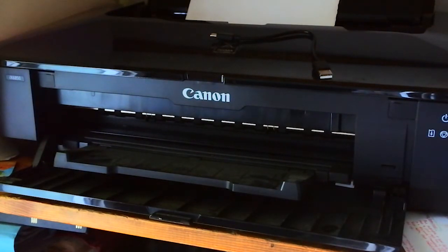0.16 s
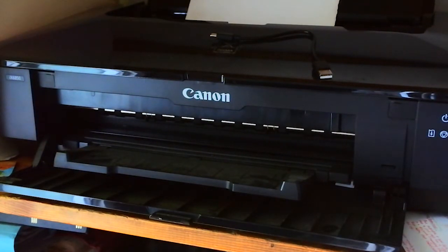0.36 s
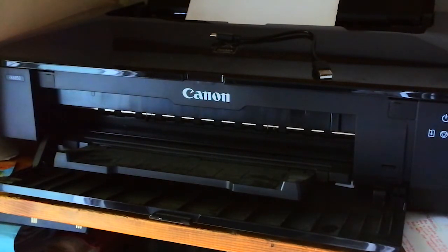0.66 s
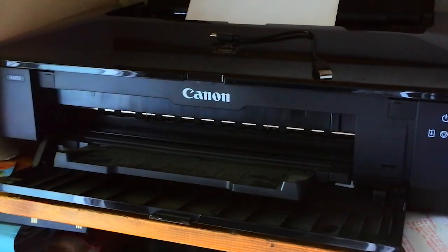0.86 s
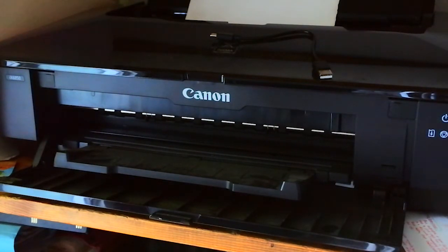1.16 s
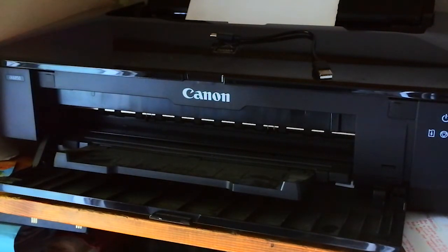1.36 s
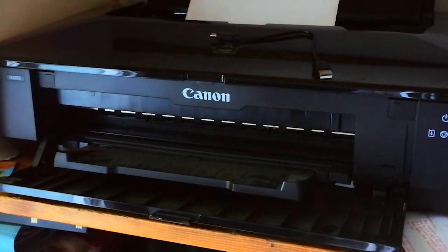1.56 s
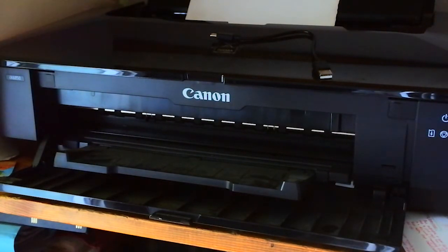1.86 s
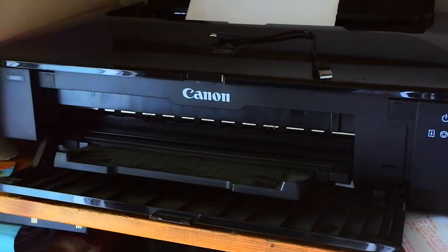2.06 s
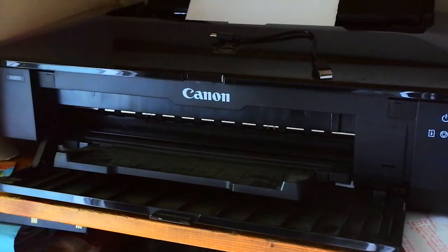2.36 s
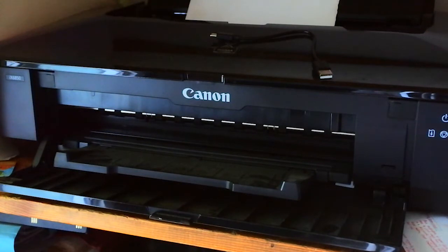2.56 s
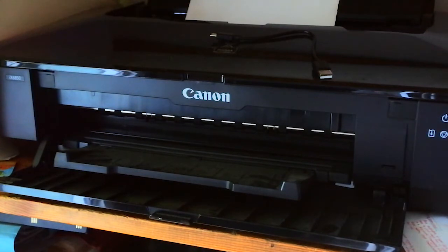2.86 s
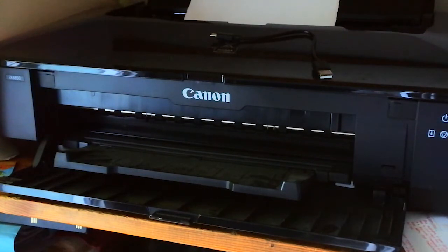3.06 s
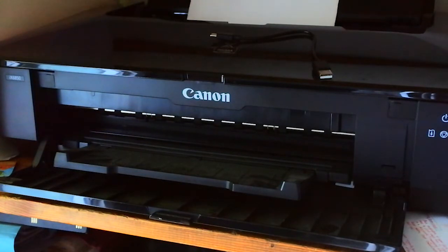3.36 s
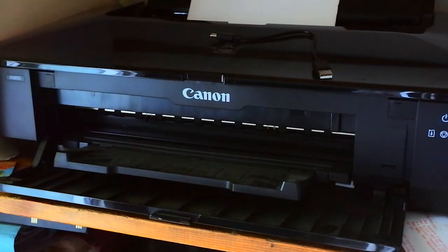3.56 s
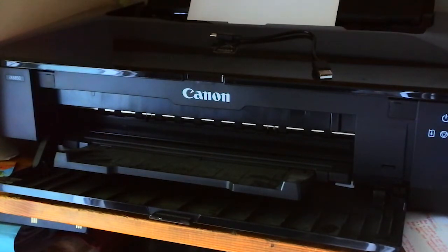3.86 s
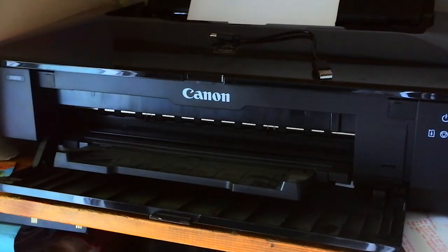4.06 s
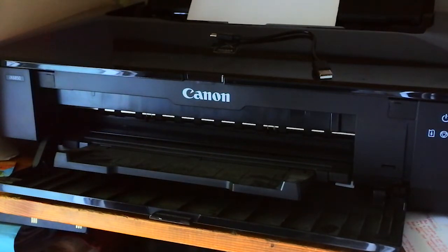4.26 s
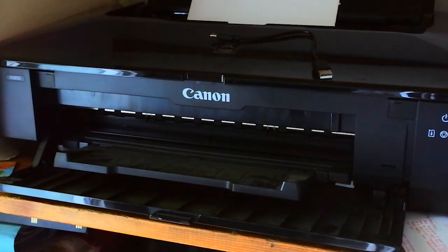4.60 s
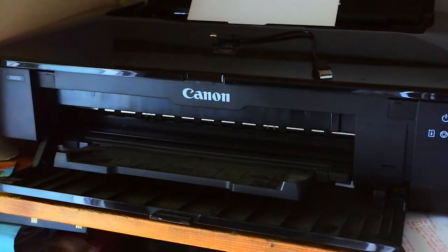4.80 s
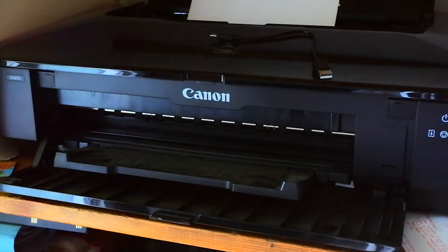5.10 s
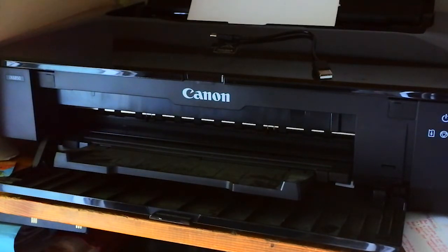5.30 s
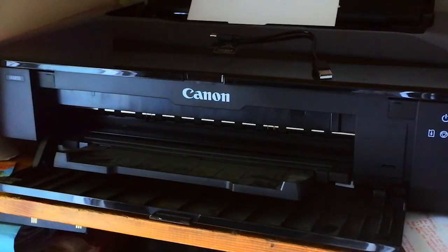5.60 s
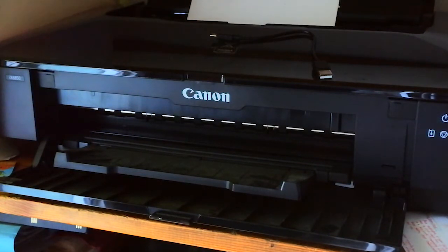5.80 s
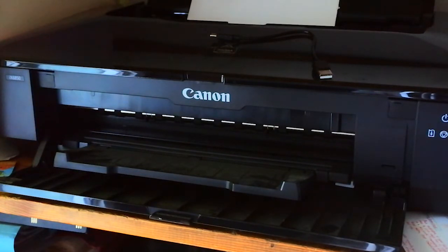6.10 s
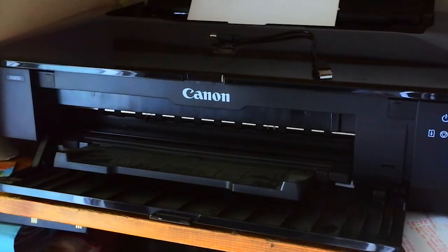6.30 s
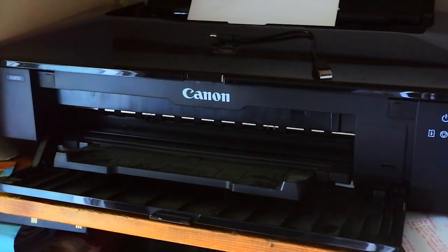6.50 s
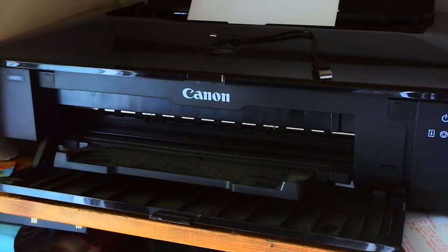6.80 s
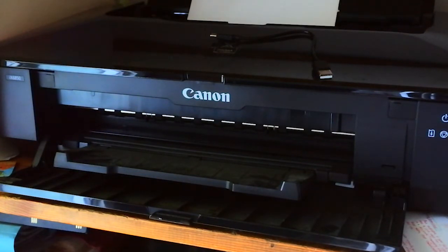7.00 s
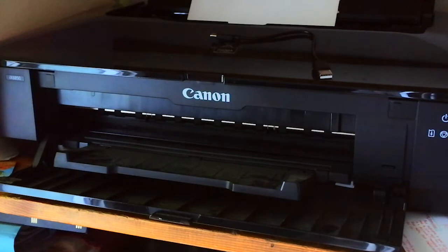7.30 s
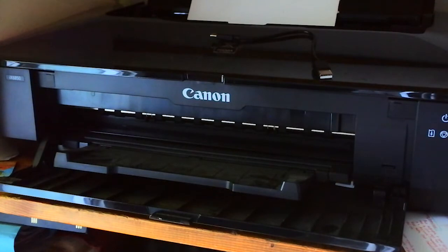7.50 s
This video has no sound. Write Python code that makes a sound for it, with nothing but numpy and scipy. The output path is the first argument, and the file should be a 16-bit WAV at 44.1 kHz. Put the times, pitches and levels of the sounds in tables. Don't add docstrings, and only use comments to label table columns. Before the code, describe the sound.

Quiet indoor air, then scattered plastic ticks, taps and brief scrapes from a nearby printer mechanism. After a lull comes a dense, loud paper grab: sharp clacks, dull rebounds, rumbling rollers and rasping paper. From then on the head shuttles regularly, its hissing whir dipping briefly just under every half second while a muted double knock marks the reversal. Close, dry stereo sound with a short small-room echo.

```python
import sys
import numpy as np
from scipy import signal
from scipy.fft import rfft, irfft
from scipy.io import wavfile
from scipy.ndimage import uniform_filter1d

SR = 44100
rng = np.random.default_rng(int(sys.argv[2]) if len(sys.argv) > 2 else 0)


def natural_amplitude(level_db):
    exponent = np.asarray(level_db, float) / 20
    return 10 ** exponent


def dump(signal):
    limited = np.clip(np.atleast_2d(signal).T, -1, 1)
    pcm = np.round(limited * 32767).astype(np.int16)
    wavfile.write(sys.argv[1], SR, pcm)


N = 337365
TIME = np.arange(N) / SR


def evened(x):
    return x / np.sqrt(np.mean(x ** 2) + 1e-20)


def read(points, hz):
    f, value = np.transpose(points)
    return np.interp(np.log(hz + 1), np.log(f + 1), value)


def coloured(x, points, peaks=(), lift=0.):
    hz = np.abs(np.fft.fftfreq(8192, 1 / SR))
    resonance = sum(lift * natural_amplitude(db) / (1 + ((hz - f) / width * 2) ** 2) for f, width, db in peaks)
    log_gain = np.log(natural_amplitude(read(points, hz)) * (1 + resonance) + 1e-5)
    minimum_phase = -signal.hilbert(log_gain).imag
    taps = np.fft.ifft(np.exp(log_gain + 1j * minimum_phase)).real[:4096]
    return signal.oaconvolve(x, taps)[:len(x)]


# (from f/Hz, to f/Hz)
LEVEL_BANDS = [(100, 450), (500, 3000), (3000, 12000)]


def thirds(x):
    hz, z = np.fft.rfftfreq(len(x), 1 / SR), rfft(x)
    low = 1 / (1 + (hz / 470) ** 6)
    high = 1 / (1 + (3000 / (hz + 1)) ** 8)
    parts = [low, 1 - low - high, high]
    power = [2 * np.sum(abs(z[(hz > a) & (hz < b)]) ** 2) / len(x) ** 2 for a, b in LEVEL_BANDS]
    return [irfft(z * part, len(x)) / np.sqrt(p) for part, p in zip(parts, power)]


def wobble(seconds, depth_db):
    size = round(seconds * SR)
    wander = uniform_filter1d(uniform_filter1d(rng.standard_normal(N), size), size)
    return natural_amplitude(depth_db * evened(wander))


def tail(t60s, start_s):
    hz, t, z = signal.stft(rng.standard_normal(SR // 2), SR, nperseg=256)
    decay = natural_amplitude(-60 * t / read(t60s, hz)[:, None])
    echo = signal.istft(z * decay, SR, nperseg=256)[1]
    return np.r_[np.zeros(round(start_s * SR)), echo / np.linalg.norm(echo)]


# (f/Hz, level/dB per Hz)
AIR_COLOUR = [(15, -10.5), (25, -28.5), (55, -8), (91, -17.5), (161, -13.5), (195, -12.5), (229, -25),
              (317, -15), (373, -22.5), (839, -27), (1260, -23.5), (2680, -31.5), (5720, -32.5),
              (13600, -45), (16000, -60)]
# (f/Hz, side re mid level/dB)
AIR_SIDE = [(60, -6.5), (110, -13), (200, -4.5), (380, -5), (700, -1.5), (1290, -3), (2380, 0),
            (4400, -0.5), (8120, 0.5), (15000, -1)]


def room_tone():
    mid, side = (coloured(rng.standard_normal(N), AIR_COLOUR) for _ in range(2))
    gain = natural_amplitude(-65) / np.sqrt(np.mean(mid ** 2))
    hum = natural_amplitude(-72) * wobble(.06, 3.8) * np.sin(2 * np.pi * 50.2 * TIME)
    return gain * mid * wobble(0.017, 0.33) + hum, gain * coloured(side, [(25, -20)] + AIR_SIDE)


def friction(rows, colour, peaks, lift, tick_db, ticks_per_s, lumps_db, dip_db=0.):
    tick_gain = natural_amplitude(tick_db + 1.4 * np.minimum(rng.exponential(1, N), 2))
    ticks = tick_gain * (rng.random(N) < ticks_per_s / SR)
    parts = thirds(coloured(rng.standard_normal(N) * (1 + ticks), colour, peaks, lift))
    s, *levels = np.transpose(rows)
    fade = np.clip(np.minimum(TIME - s[0], s[-1] + 0.032 - TIME) / 0.063, 0, 1)
    low, mid, high = (natural_amplitude(np.interp(TIME, s, db)) * p * fade for db, p in zip(levels, parts))
    lumps = wobble(0.0095, lumps_db)
    return low * wobble(0.023, lumps_db) + lumps * (mid * natural_amplitude(-.34 * dip_db) + high * natural_amplitude(-dip_db))


# (f/Hz, width f/Hz, level/dB)
CASE_MODES = [(155, 430, -15.5), (530, 51, 1), (753, 106, -6.5), (1070, 18, -12), (1230, 90, -6),
              (1680, 110, -10), (2100, 72, -55), (2530, 510, -5.5), (3270, 22, 3), (4430, 146, -3),
              (5650, 97, -43), (5800, 51, -41), (6350, 42, -32), (6850, 77, -21), (8200, 59, -18),
              (8140, 65, -26)]
# (f/Hz, level/dB per Hz)
DRIVE_SPECTRUM = [(41, -45), (70, -44.5), (113, -7), (256, -6.5), (314, -9.5), (368, -5.5), (421, -10.5),
                  (1250, -12), (1440, -16), (3650, -22.5), (4480, -20), (9690, -28), (16000, -52)]
# (t/s, drag level/dB)
SHEET_DRAG = [(2.8, -78), (2.97, -76), (3.04, -60), (3.164, -59), (3.27, -67), (3.41, -63), (3.52, -61),
              (3.56, -64), (3.6, -84), (3.64, -70), (3.71, -63), (3.768, -90), (3.81, -66), (4.03, -58.5),
              (4.28, -59), (4.52, -57), (4.66, -54), (4.7, -60)]


def drive_train():
    s, drag = np.transpose(SHEET_DRAG)
    swing = drag + 62
    eased_s = np.maximum(s - 4.1, 0)
    creeping = s < 2.99
    rollers = -49.5 - 13 * creeping - 15 * eased_s + .2 * swing
    gears = -54 + .7 * swing - 12 * creeping - 10 * eased_s
    idle_db = np.array([-71, -73, -80])
    resting_db = idle_db - 14
    idling = [(.2, *idle_db), (2.1, *idle_db), (2.3, *resting_db), (s[0] - .05, *resting_db)]
    rows = idling + list(zip(s, rollers, gears, drag))
    return friction(rows, DRIVE_SPECTRUM, CASE_MODES, 0.6, 8.1, 180, 1.33)


# (t/s, length t/s, rumble level/dB, rubbing level/dB, rumble f/Hz)
CAM_RUBS = [
    (0.251, 0.12, -58, -58, 500),
    (0.585, 0.1, -59, -57, 800),
    (.66, .08, -62, -56, 330),
    (1.25, .13, -63, -72, 200),
    (2.08, .25, -73, -80, 480),
    (2.855, 0.085, -54, -64, 780),
    (2.995, .12, -47, -42, 180),
    (3.388, .12, -49, -56, 104),
]
# (t/s, length t/s, rumble level/dB, rubbing level/dB, rumble f/Hz)
PAPER_RUBS = [(.33, .13, -56, -54, 150), (0.679, 0.056, -49, -57, 380), (0.884, 0.065, -63, -54, 500),
              (1.465, 0.1, -56, -55.5, 200), (1.867, 0.021, -71, -57, 300), (1.89, .09, -54, -60, 330),
              (1.95, 0.13, -53, -61, 130), (3.002, 0.13, -47, -59, 105), (3.288, 0.099, -48, -44.5, 110),
              (3.396, 0.061, -52, -44, 394), (3.64, 0.105, -55, -51, 276), (3.812, 0.073, -38, -37, 288),
              (3.92, .05, -51, -46, 200), (3.987, 0.093, -44, -64, 100), (4.057, 0.17, -39.5, -52, 231),
              (4.534, 0.16, -61, -58, 201)]


def slips():
    low, mid, high = thirds(coloured(rng.standard_normal(N), DRIVE_SPECTRUM, CASE_MODES, lift=1.7))
    lumps, out = wobble(0.0075, 2.66), np.zeros(N)
    rows = [(*row, -18) for row in CAM_RUBS] + [(*row, -8.5) for row in PAPER_RUBS]
    for s, length, rumble_db, chatter_db, hz, hiss_db in rows:
        part = slice(round(s * SR), round((s + length) * SR))
        shake = evened(signal.lfilter(*signal.iirpeak(hz, 2.7, SR), low)[part])
        rub = lumps[part] * natural_amplitude(chatter_db) * (mid[part] + natural_amplitude(hiss_db) * high[part])
        out[part] += (natural_amplitude(rumble_db) * shake + rub) * signal.windows.tukey(len(shake), .5)
    return out


# (f/Hz, level/dB per Hz)
SLIDE_SPECTRUM = [(41, -57), (70, -34), (86, -13), (118, -4.5), (280, -6.5), (343, -3), (385, -12),
                  (634, -6), (955, -15.5), (1930, -18.5), (2540, -12), (3040, -15.5), (6590, -7.5),
                  (11100, -15.5), (16000, -35)]
# (f/Hz, width f/Hz, level/dB)
RAIL_MODES = [(641, 19, 2.5), (2580, 82, 1.5), (3520, 410, 3), (4140, 10, 10), (4670, 540, 5.5),
              (5360, 190, 3), (6340, 210, 0), (6350, 110, -22), (6950, 150, -5), (8800, 34, 8)]
# (brake t/s, restart t/s, knock level/dB, jerk level/dB, hiss dip level/dB)
HOME_END = [
    (4.995, 5.101, -44, -50, 32),
    (5.864, 5.963, -46.5, -47, 34),
    (6.725, 6.822, -44.5, -46, 23),
    (7.578, 7.68, -44, -45, 28),
]
FAR_END = [
    (5.397, 5.515, -50, -47, 15),
    (6.261, 6.375, -46.5, -46, 19),
    (7.109, 7.235, -47.5, -47, 16),
]


def print_head():
    stops = [(s, db, .032) for _, s, _, _, db in HOME_END]
    stops += [(s, db, .022) for _, s, _, _, db in FAR_END]
    dip_db = sum(db * np.exp(np.minimum(TIME - s, 0) / slow) * (TIME < s) for s, db, slow in stops)
    dip_db = uniform_filter1d(dip_db, 60)
    air_dip_db = np.zeros(N)
    for s, db, slow in stops:
        change_s = np.where(TIME < s, .71 * slow, .022)
        air_dip_db += .62 * db * np.exp(-abs(TIME - s) / change_s)
    sweeps = [(s, -62.5, -58.5, -55.5) for s in (4.65, (N + SR) / SR)]  # rumble, belt, hiss in dB
    slide = friction(sweeps, SLIDE_SPECTRUM, RAIL_MODES, .6, 4, 300, 0.83, dip_db)
    body = signal.sosfiltfilt(signal.butter(1, 8000, fs=SR, output="sos"), slide)
    teeth = evened(signal.lfilter(*signal.iirpeak(634, 634 / 55, SR), rng.standard_normal(N)))
    starting = np.clip((TIME - 4.58) / 0.044, 0, 1)
    whine = natural_amplitude(-69 - 1.5 * dip_db) * teeth * wobble(.08, 1.8) * starting
    return body + (slide - body) * natural_amplitude(-air_dip_db) + whine


# (lag t/s, level/dB re knock or jerk, fizz level/dB, thud level/dB, snap level/dB, rattle t/s)
BRAKE_AT_HOME = (-.003, 0, -17, 1.5, -5, .02)
SETTLE_AT_HOME = (.055, -10, -22, 3, -14, .014)
JERK_FROM_HOME = (.014, -1, -20, -12, -7, .016)
BRAKE_AT_FAR = (0, .5, -20, 0, -10, .02)
SHEET_STEPS_ON = (.056, 1.5, -19, -16, -3, .017)
JERK_FROM_FAR = (-.012, 0, -20, -3, -9, .02)
# (panel level/dB re knock, panel f/Hz, small part level/dB re knock, small part f/Hz)
RING_AT_HOME = (1.5, 420, -4, 2150)
RING_OF_STEP = (-4, 620, 0, 4500)


def turns():
    knocks, rings = [], []
    home = (HOME_END, [BRAKE_AT_HOME, SETTLE_AT_HOME], JERK_FROM_HOME, RING_AT_HOME)
    far = (FAR_END, [BRAKE_AT_FAR, SHEET_STEPS_ON], JERK_FROM_FAR, RING_OF_STEP)
    for rows, braking, jerk, (panel_db, panel_hz, small_db, small_hz) in (home, far):
        loudest_lag = max(braking, key=lambda knock: knock[1])[0]
        for brake_s, restart_s, db, jerk_db, _ in rows:
            knocks += [(brake_s + lag, db + rel, *rest) for lag, rel, *rest in braking]
            knocks.append((restart_s + jerk[0], jerk_db + jerk[1], *jerk[2:]))
            rings.append((brake_s + loudest_lag, db + panel_db, panel_hz, db + small_db, small_hz))
    return [knock for knock in knocks if knock[0] < N / SR], rings


# (t/s, rattle level/dB, snap level/dB re rattle, main ring f/Hz, main ring level/dB)
PAWL_BLOWS = [
    (3.06, -15, -5, 3270, -16),
    (3.387, -20, -4, 2494, -12.5),
]
LATCH_BLOWS = [
    (0.67, -30, -2, 2610, -27),
    (3.944, -44, -10, 2450, -34),
    (4.185, -30.5, 1, 4370, -25),
    (4.239, -44.5, -14, 2600, -38.5),
]
GEAR_BLOWS = [
    (0.934, -37, -15, 2100, -38),
    (1.685, -37, -11, 1900, -42),
    (1.709, -46.5, -11, 1680, -46),
    (3.41, -31, -26, 1656, -23),
    (3.797, -30, -10, 2130, -23),
    (3.917, -33, -5, 2080, -31),
    (5.127, -43, -8, 1720, -41),
]
TRAY_BLOWS = [
    (0.271, -42.5, -4, 514, -37),
    (0.369, -38.5, 3.5, 482, -33),
    (1.48, -43, -7, 325, -38),
    (3.698, -52, -15, 345, -40),
]
LEVER_BLOWS = [
    (0.897, -47, -9, 526, -43),
    (1.531, -45, -6, 519, -43),
    (2.997, -19, -13, 717, -14.5),
    (3.026, -26, -11, 794, -16),
    (3.293, -33.5, -17, 605, -33.5),
    (3.322, -33, -3, 651, -25),
    (3.85, -26, -12, 644, -23.5),
    (3.994, -35.5, -9.5, 293, -37.5),
    (4.301, -43, -19, 950, -42),
]
COVER_BLOWS = [
    (1.463, -49.5, -4, 1515, -49),
    (1.889, -36, -17, 694, -31.5),
    (2.848, -49, -13, 1520, -54),
    (3.092, -36, -22, 1106, -26),
    (3.189, -38.5, -18, 1220, -36.5),
]
# (second ring f/Hz, its level/dB re main, thud level/dB re rattle, fizz level/dB re snap, rattle t/s)
PAWL_BODY = (1130, -3.5, -30, -9, .01)
LATCH_BODY = (620, -11, -16, -16, .012)
GEAR_BODY = (1250, -10, -20, -24, .011)
TRAY_BODY = (2100, -15, 2, -12, .012)
LEVER_BODY = (2480, -8, -12, -13, .012)
COVER_BODY = (1750, -8, -12, -12, .013)
# (t/s, peak level/dB, snap level/dB re peak, thud level/dB re peak)
LOOSE_SHAKES = [(0.349, -50.5, -7, 12), (0.382, -34.5, -6, -7), (1.035, -51, -18, 8),
                (1.559, -48.5, -20, -3), (2.914, -53, -24, 6), (3.363, -31, -14, -28),
                (3.552, -45.5, -16, -12), (3.618, -46, -18, -2), (3.785, -45, -18, -10),
                (3.85, -33, -1, -4), (4.115, -45, -14, 11)]


def blows():
    rattles = [(s, db, snap - 7, thud, snap, .013) for s, db, snap, thud in LOOSE_SHAKES]
    rings = []
    parts = [(PAWL_BLOWS, PAWL_BODY), (LATCH_BLOWS, LATCH_BODY), (GEAR_BLOWS, GEAR_BODY),
             (TRAY_BLOWS, TRAY_BODY), (LEVER_BLOWS, LEVER_BODY), (COVER_BLOWS, COVER_BODY)]
    for rows, (other_hz, other_db, thud, fizz, length) in parts:
        for s, db, snap, hz, ring_db in rows:
            modes = sorted([(hz, ring_db), (other_hz, ring_db + other_db)])
            (large_hz, large_db), (small_hz, small_db) = modes
            rattles.append((s, db, snap + fizz, thud, snap, length))
            rings.append((s - .0015, large_db, large_hz, small_db, small_hz))
    return rattles, rings


def panels(rings):
    out, t = np.zeros(N + SR), np.arange(SR // 8) / SR
    lengths = (.012, .008)
    for (s, *modes), twin in zip(rings, rng.uniform(.85, 1.15, (len(rings), 2))):
        at = round((s - .001) * SR)
        for db, hz, length, ratio in zip(modes[::2], modes[1::2], lengths, twin):
            pair = np.sin(2 * np.pi * hz * t) + natural_amplitude(-4) * np.sin(2 * np.pi * hz * ratio * t)
            shape = (1 - np.exp(-t / .0038)) * np.exp(-(t / length) ** 1.5)
            out[at:at + len(t)] += natural_amplitude(db - 2.5) * shape * pair
    return out[:N]


# (f/Hz, level/dB per Hz)
CLACK_SPECTRUM = [(41, -71), (70, -31), (129, -6.5), (412, -10), (649, -2), (912, -9), (1050, -1.5),
                  (1440, -6), (2540, -7.5), (2910, -10), (5750, -10.5), (10900, -18), (16000, -45)]


def clacks(rows, rise=0.002, thud_hz=190, thud_t60=0.22, thud_rise=0.0067, level_db=-7, rumble=1.0, tone=0.71):
    low, mid, high = thirds(coloured(rng.standard_normal(N), CLACK_SPECTRUM, CASE_MODES, lift=1.0))
    crisp = signal.sosfiltfilt(signal.butter(3, 6500, fs=SR, output="sos"), high)
    crisp, fizz = evened(crisp), evened(high - crisp)
    grain, out, t = wobble(0.0013, 3.3), np.zeros(N + SR), np.arange(SR // 3) / SR
    for (s, db, fizz_db, thud_db, snap_db, length), detune in zip(rows, rng.random(len(rows))):
        at, length = round((s - .001) * SR), np.clip(length, .003, .06)
        start = min(at, N - len(t))
        part = slice(start, start + len(t))
        after = natural_amplitude(-12 - 60 * t / (9 * length))
        rattle = (np.exp(-(t / length) ** 2) + after) * mid[part]
        treble = natural_amplitude(snap_db) * crisp[part] + natural_amplitude(fizz_db) * fizz[part]
        snap = (np.exp(-(t / (length * .99)) ** 2) + after) * treble
        tray_tone = np.sin(2 * np.pi * thud_hz * (1.1 + 0.095 * detune) * t)
        tray = rumble * low[part] + tone * tray_tone
        thud = (1 - np.exp(-t / thud_rise)) * natural_amplitude(thud_db - 60 * t / thud_t60) * tray
        hit = (1 - np.exp(-t / rise)) * grain[part] * (rattle + snap) + thud
        out[at:at + len(t)] += natural_amplitude(db + level_db) * hit
    return out[:N]


# (f/Hz, t60 t/s)
ROOM_T60 = [(150, 0.14), (500, 0.24), (2500, 0.2), (8000, .16)]
# (f/Hz, side re mid level/dB)
NEAR_SIDE = [(60, -18), (110, -38.5), (200, -27), (380, -16.5), (700, -18), (1290, -10), (2380, -8),
             (4400, -5.5), (8120, -3), (15000, -0.5)]


def scene():
    (rattles, rings), (bumps, soft_rings) = blows(), turns()
    knocks = clacks(bumps, rise=0.0081, thud_hz=172, thud_t60=0.41, thud_rise=0.0064,
                    level_db=-4, rumble=0.68, tone=1.0)
    printer = drive_train() + slips() + print_head() + knocks + clacks(rattles)
    printer = printer + natural_amplitude(-7.5) * signal.oaconvolve(printer, tail(ROOM_T60, .006))[:N]
    printer = printer + panels(rings + soft_rings)
    near = np.zeros(N)
    for k in range(0, 6, 2):
        window = np.sqrt(2 / 3) * np.cos(2 * np.pi * (11 * TIME + k / 6))
        near += signal.oaconvolve(printer * window, tail([(200, 0.017), (8000, 0.075)], 0.))[:N]
    air, air_side = room_tone()
    mid = printer + air
    side = coloured(near, NEAR_SIDE) + air_side
    return np.array([mid + side, mid - side])


def roll_off(x):
    return signal.sosfilt(signal.butter(12, 16130, fs=SR, output="sos"), x)


def record(dry):
    cut = signal.sosfilt(signal.butter(4, 36, "highpass", fs=SR, output="sos"), dry)
    band_limit = signal.firwin(511, 15750, window=("kaiser", 9), fs=SR)
    mix = signal.oaconvolve(cut, band_limit[None], "same")
    return roll_off(mix)


dry = scene()
out = record(dry)
dump(out)
```